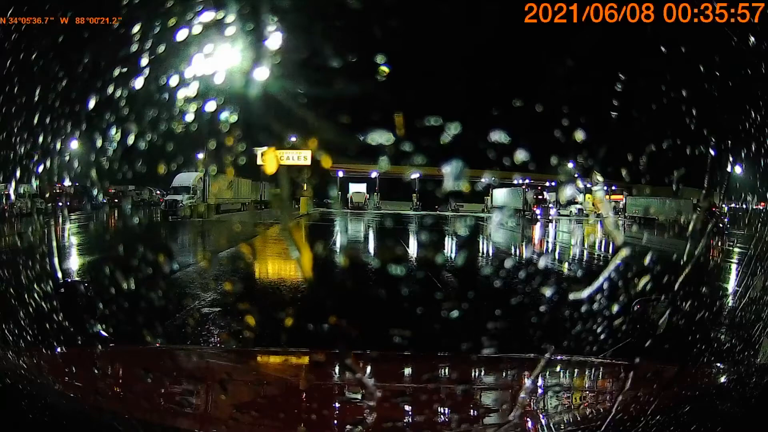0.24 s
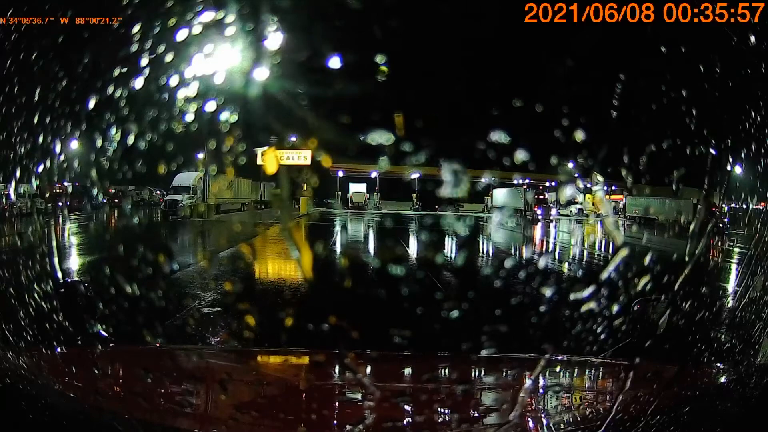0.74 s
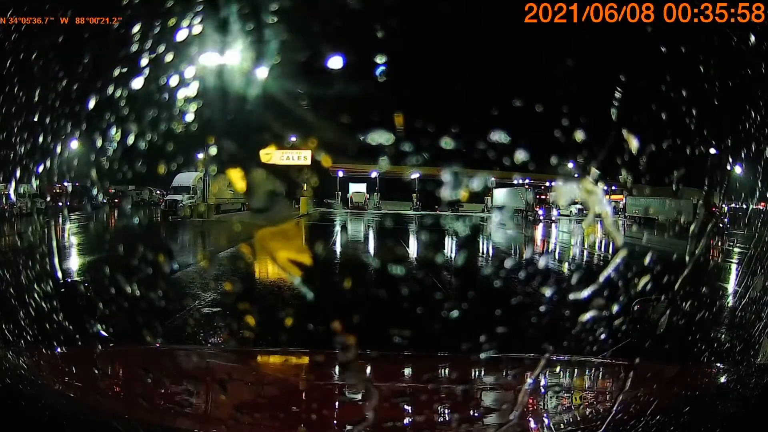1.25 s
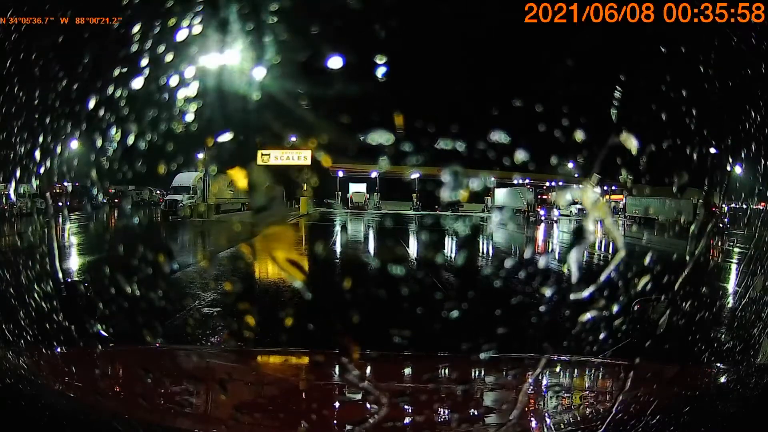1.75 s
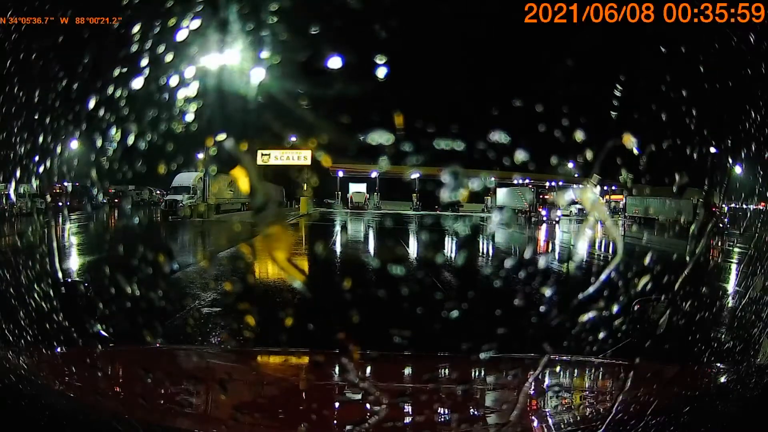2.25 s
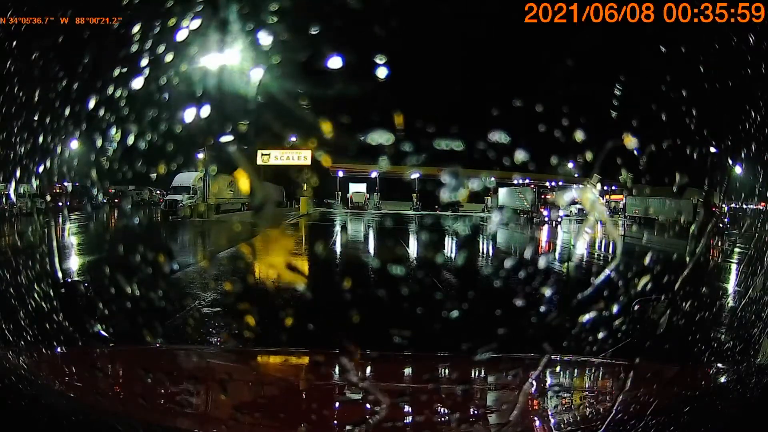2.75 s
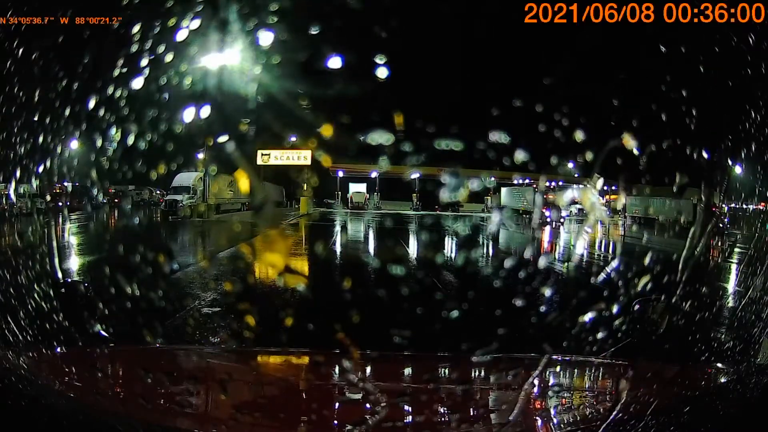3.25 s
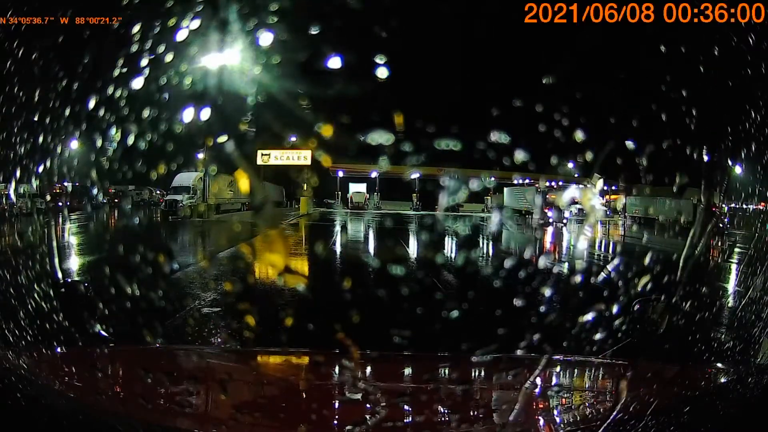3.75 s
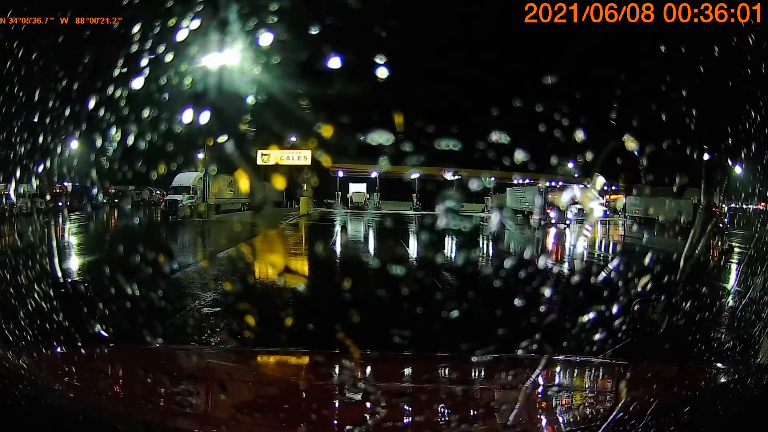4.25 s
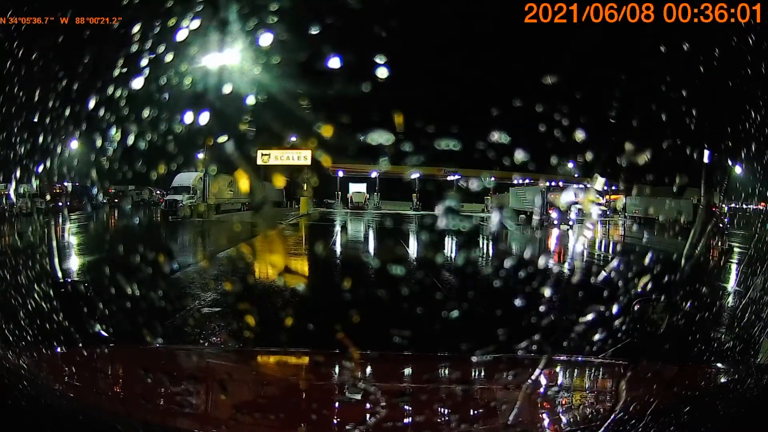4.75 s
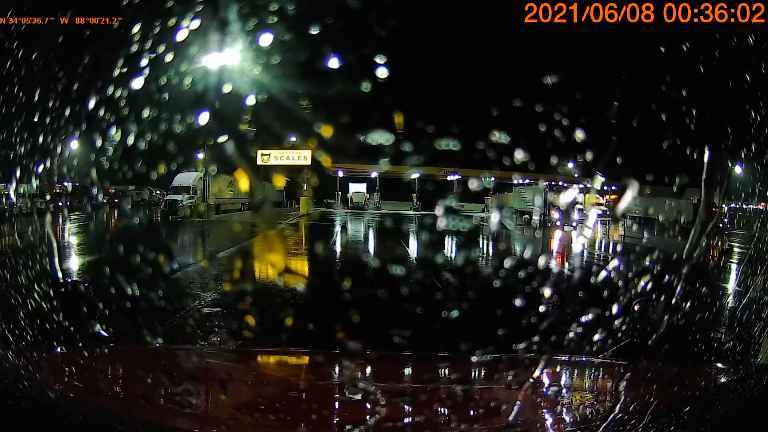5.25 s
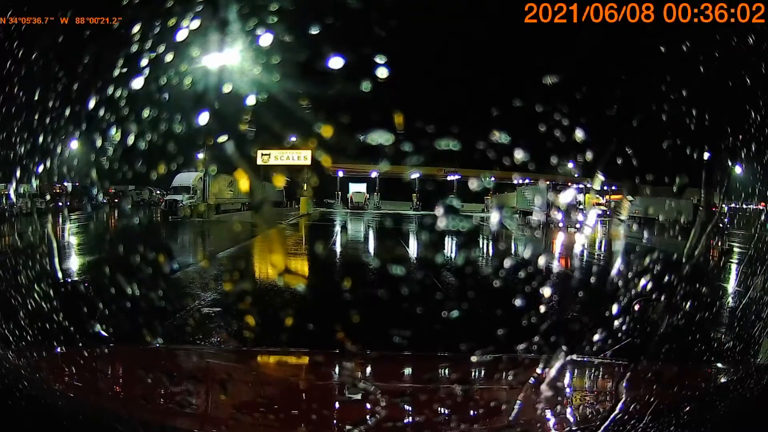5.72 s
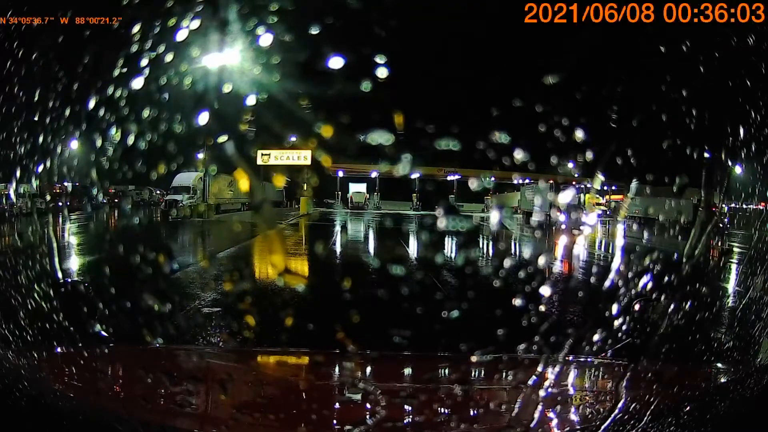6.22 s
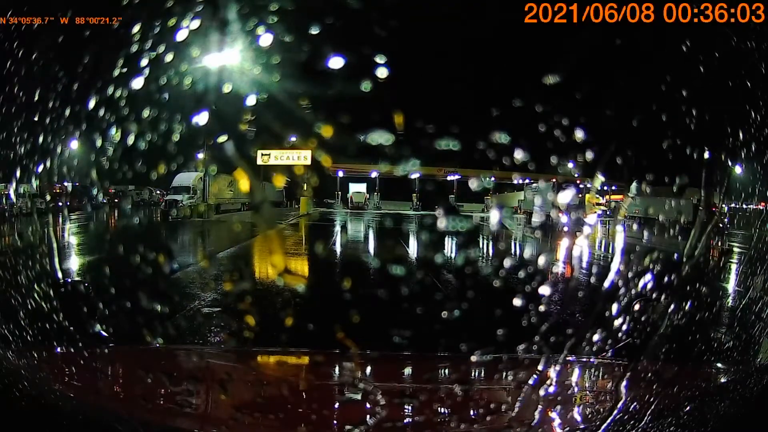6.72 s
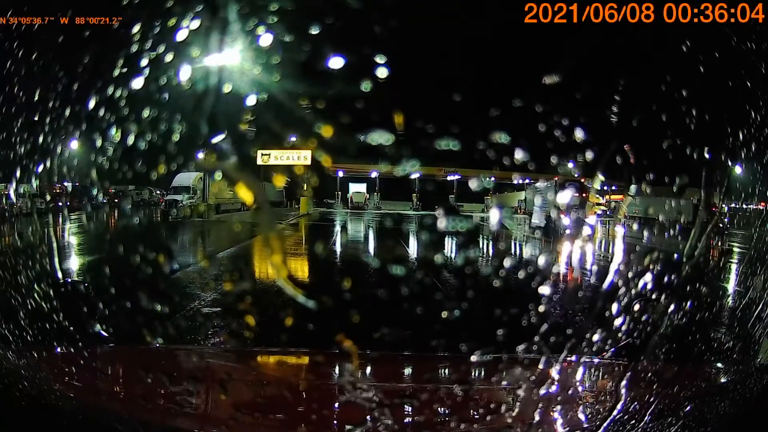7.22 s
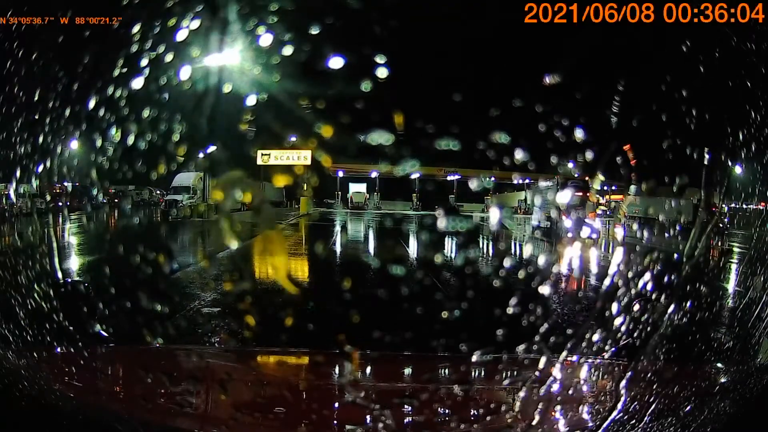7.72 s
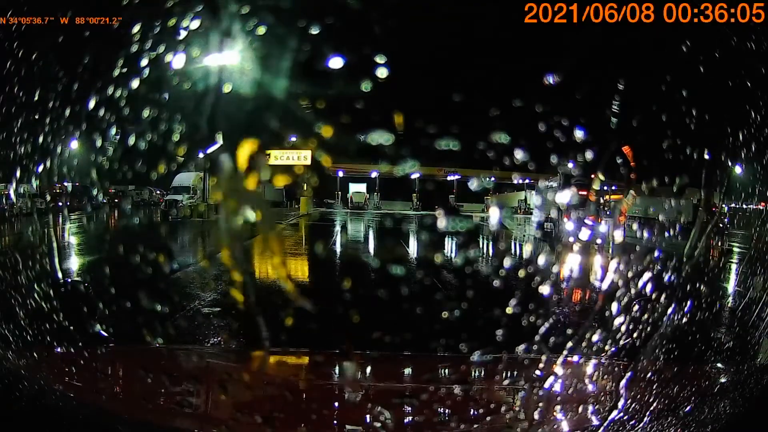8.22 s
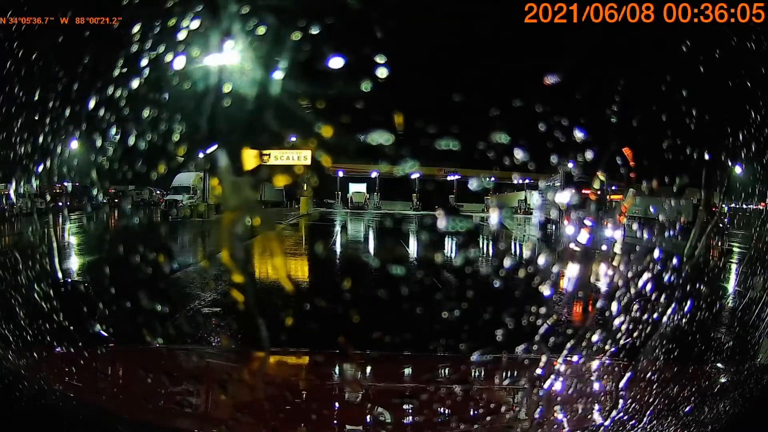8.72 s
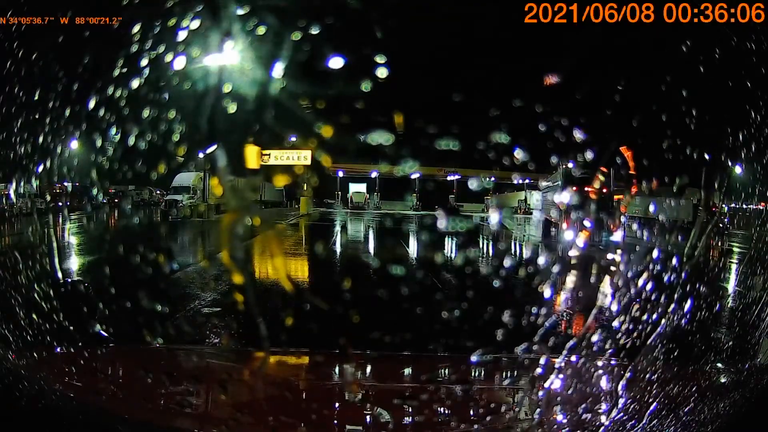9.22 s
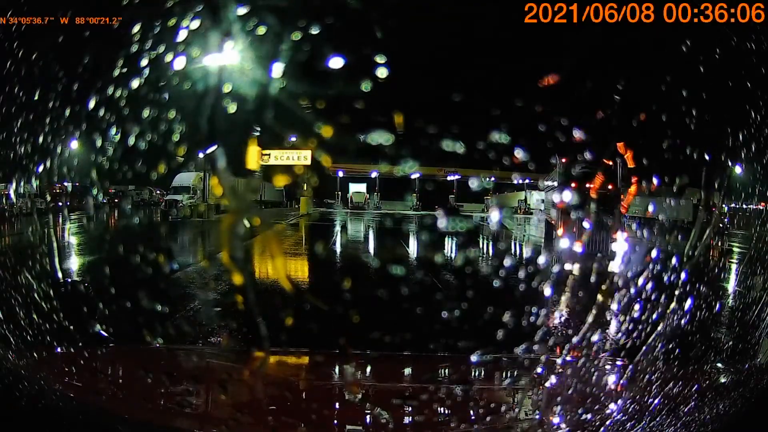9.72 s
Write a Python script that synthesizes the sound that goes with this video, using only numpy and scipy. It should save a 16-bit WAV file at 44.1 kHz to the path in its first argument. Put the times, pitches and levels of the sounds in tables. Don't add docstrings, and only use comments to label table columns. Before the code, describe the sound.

Inside a parked truck cab, a six-cylinder diesel idles with a low throbbing roar, steady clatter and knocks, over faint electrical buzz.

```python
import sys
import numpy as np
from scipy import signal
from scipy.fft import rfft, irfft, next_fast_len
from scipy.io import wavfile
from scipy.ndimage import uniform_filter1d, map_coordinates

SR = 44100
rng = np.random.default_rng(int(sys.argv[2]) if len(sys.argv) > 2 else 0)


def volts_from_decibels(level):
    exponent = np.asarray(level, float) / 20
    return 10 ** exponent


def store_pcm(level_fs):
    pcm = np.round(np.clip(level_fs, -1, 1) * 32767).astype(np.int16)
    wavfile.write(sys.argv[1], SR, np.atleast_2d(pcm).T)


N = 439677

CYCLE_HZ, FIRINGS_A_CYCLE = 4.99677, 6
FRAME_HZ = 29.9806
FIRST_FIRING_S = .031
# start_s, length_s
DROPOUT = (5.2673, .021333)
# time_s, crank_late_ms
IDLE_HUNTING = [
    (0, -1.5),
    (2, -.5),
    (4.5, 1.5),
    (6, -.5),
    (8, 1),
    (10, -1),
]
# pitch_hz, level_db (per Hz)
ROAR_SPECTRUM = [(12, -55.5), (26, -36.5), (38, -25), (55, -5.5), (100, -3.5), (151, -6.5), (318, -14),
                 (832, -19), (1170, -22), (1580, -32.5), (2120, -32.5), (3940, -43.5), (6140, -48.5),
                 (7300, -46.5)]
# pitch_hz, width_hz, gain_db
CAB_RESONANCES = [(212, 15, 5), (270, 20, 4), (355, 30, 3), (425, 22, 6), (460, 30, -4), (500, 30, 6),
                  (535, 20, 4), (568, 15, 3), (592, 20, -5), (628, 25, 6), (705, 30, 5), (860, 90, 1),
                  (1020, 60, -6), (1160, 140, -5), (1290, 40, -4), (1520, 100, -2), (1870, 50, -4),
                  (2470, 80, -3), (6500, 400, 2), (1797, 36, 4), (2090, 90, 3), (2930, 120, 3),
                  (3290, 44, 4), (3600, 300, 2), (4395, 44, 4), (5120, 76, 3), (5725, 40, 3),
                  (6090, 100, 3), (6270, 40, 5)]
# multiple_of_cycle, level_db
CRANK_ORDERS = [(17, -62), (22, -62.5), (27, -49), (33, -52), (39, -63), (43, -64.5), (49, -59), (54, -67)]
# pitch_hz, level_db
NEIGHBOUR_TONES = [(42.3, -58.5), (54.1, -63), (58.2, -59), (68.3, -62.5), (74.06, -51), (81.6, -64.5),
                   (89.4, -61), (96.9, -52.5), (104.1, -62), (105.8, -56), (111.7, -57), (134, -54.5),
                   (138.1, -54), (152.4, -63.5), (155.06, -45.5), (159, -66.5), (428.8, -65)]
# pitch_hz, level_db, in_step_s (with the first)
BEATING_TONES = [(46.923, -45.8, 2), (45.934, -49.7, 1.88), (45.021, -52.3, 2.05), (44.161, -55.7, 2.05),
                 (44.582, -62, 1.99)]
# multiple_of_frame_rate, level_db
FRAME_HUM = [(1, -47), (2, -46), (3, -52), (4, -50), (5, -54), (6, -60.5), (7, -65.5)]
PART_MODES = { "block": [(427, 0, .07), (500, 0, .06), (535, -3, .08), (630, 0, .07), (705, -1, .07),
              (760, -5, .07)], "cover": [(905, -6, .09), (942, -2.5, .1), (987, 0, .105)],
              "shield": [(1062, 0, .12), (1103, -1, .12)], "bracket": [(1350, 0, .1), (1420, -5, .07)],
              "pump": [(1797, -2, .08), (1940, -3, .03), (2090, 0, .04), (2190, -3, .03)]}
COMBUSTION_KNOCKS = { "block": (0, [-50, -50, -43, -43, -42.5, -51.5]),
                     "cover": (-.0005, [-53, -40, -51, -47.5, -55, -46.5]),
                     "pump": (-.005, [-61, -54.5, -57.5, -60, -60, -58])}
FURTHER_KNOCKS = { "block": [(.016, -50.5), (.083, -48.5), (.114, -38.5), (.149, -45), (.178, -41)],
                  "cover": [(.079, -51), (.090, -48)], "shield": [(.003, -53), (.031, -56.5), (.072, -49),
                  (.096, -60.5), (.132, -54), (.157, -59), (.188, -58.5)], "pump": [(.036, -59.5),
                  (.100, -62), (.138, -59.5), (.188, -62.5)]}
# start_s, peak_db
HARD_KNOCKS = [
    (2.6994, -47),
    (3.0694, -45),
    (5.4994, -49),
    (6.4792, -46),
    (7.4425, -49),
    (8.2741, -45),
]


def unit(x):
    return x / np.sqrt(np.mean(x ** 2) + 1e-20)


def wobble(rate):
    knots = rng.standard_normal(int(N * rate / SR) + 4)
    return map_coordinates(knots, [np.arange(N) * rate / SR])


def filtered(x, response):
    m = next_fast_len(N + SR // 2)
    return irfft(rfft(x, m) * response(np.fft.rfftfreq(m, 1 / SR)), m)[..., :N]


def cab(f):
    hz, db = np.transpose(ROAR_SPECTRUM)
    bumps = sum(gain / (1 + (2 * (f - centre) / width) ** 2) for centre, width, gain in CAB_RESONANCES)
    return volts_from_decibels(np.interp(np.log(f + 1), np.log(hz + 1), db) + bumps)


def true_time():
    t = np.arange(N) / SR
    start_s, length_s = DROPOUT
    return t + length_s * np.clip((t - start_s) / .008, 0, 1)


def roar():
    spectrogram = signal.stft(rng.standard_normal(N), nperseg=512)[2]
    patches = uniform_filter1d(rng.standard_normal(spectrogram.shape), 8, 0)
    patches = unit(uniform_filter1d(patches, 5, 1))
    noise = signal.istft(spectrogram * volts_from_decibels(.6 * patches), nperseg=512)[1][:N]

    t = true_time()
    firing = np.cos(2 * np.pi * FIRINGS_A_CYCLE * CYCLE_HZ * (t - .027))
    once_a_cycle = np.cos(2 * np.pi * CYCLE_HZ * (t - .07))
    flutter = wobble(22)
    flutter = flutter - uniform_filter1d(flutter, size=SR // 6)
    swell = volts_from_decibels(1.0 * firing + 0.47 * once_a_cycle + 0.84 * flutter)

    def engine_share(f):
        return 1 / (1 + (800 / (f + 1)) ** 4) / (1 + (f / 6500) ** 4)

    steady = filtered(noise, cab)
    pulsing = filtered(noise * (swell - 1), lambda f: cab(f) * engine_share(f))
    return volts_from_decibels(-40) * (steady + pulsing) / np.std(steady)


def tone(hz, t, drift):
    return np.sqrt(2) * np.sin(2 * np.pi * (hz * t + rng.random() + drift * wobble(1.5)))


def drones():
    t = true_time()
    total = np.zeros(N)
    for order, db in CRANK_ORDERS:
        total += volts_from_decibels(db + 1.8 * wobble(1.5)) * tone(order * CYCLE_HZ, t, drift=.067)
    for hz, db in NEIGHBOUR_TONES:
        total += volts_from_decibels(db + 1.8 * wobble(4)) * tone(hz, t, drift=.08)
    return total


def throb():
    t = true_time()
    lead_hz = BEATING_TONES[0][0]
    total = np.zeros(N)
    for hz, db, in_step_s in BEATING_TONES:
        turns = hz * t + (lead_hz - hz) * in_step_s
        total += volts_from_decibels(db + .5 * wobble(2.5)) * np.sqrt(2) * np.sin(2 * np.pi * turns)
    return total


def frame_buzz():
    t = true_time()
    hum = np.zeros(N)
    for k, db in FRAME_HUM:
        level = volts_from_decibels(db + 1.6 * wobble(3.5) * (k > 1))
        hum += level * np.sqrt(2) * np.cos(2 * np.pi * k * FRAME_HZ * (t - .0012))

    frames = (t - .0285) * FRAME_HZ
    since = frames % 1 / FRAME_HZ
    late = .00003 * (np.floor(frames) % 3 == 1)
    gate = np.clip(since / .0015, 0, 1) * np.clip((.012 - since) / .002, 0, 1) * volts_from_decibels(-300 * since)
    whine = np.sin(2 * np.pi * 6085 * (since - late))
    whine += 0.2 * np.sin(2 * np.pi * 6040 * (since - late))
    return hum + volts_from_decibels(-68 + 1.5 * wobble(14)) * gate * whine


def every_cycle(offsets, db, scatter_db, jitter_s):
    t = true_time()
    crank = t - np.interp(t, *np.transpose(IDLE_HUNTING)) / 1000
    when = np.arange(-1, 51)[:, None] / CYCLE_HZ + offsets
    early_late, soft_hard = rng.standard_normal((2,) + when.shape)
    at = np.interp(when + jitter_s * early_late, crank, np.arange(N)).astype(int)
    start_s, length_s = DROPOUT
    heard = (at > 0) & (at < N - 1) & (np.abs(when - start_s - length_s / 2) > length_s / 2)
    strength = volts_from_decibels(db + scatter_db * soft_hard) * heard
    return np.bincount(at.ravel(), strength.ravel(), N)


def clatter():
    place, chance = rng.random((500, 2)).T
    hits = every_cycle(place / CYCLE_HZ, 3 * np.log(chance + .05), scatter_db=2, jitter_s=.00012)
    return volts_from_decibels(-48) * unit(filtered(hits, lambda f: cab(f) * (f > 180) / (1 + (f / 2500) ** 4)))


def bracket_rattle():
    rattles = 16
    turn = np.arange(rattles) / rattles
    slap_s, slap_extra_db = .0875, 8.5
    return slap_s + turn / CYCLE_HZ, -63.5 + 3 * np.cos(2 * np.pi * turn) + slap_extra_db * (turn == 0)


def contacts(part):
    if part == "bracket":
        return bracket_rattle()
    lag_s, cylinders_db = COMBUSTION_KNOCKS.get(part, (0, []))
    fired = []
    for k, db in enumerate(cylinders_db):
        fired.append((FIRST_FIRING_S + lag_s + k / FIRINGS_A_CYCLE / CYCLE_HZ, db))
    return np.transpose(fired + FURTHER_KNOCKS[part])


def knocks():
    t = np.arange(SR // 8) / SR
    total = np.zeros(N)
    for part, modes in PART_MODES.items():
        ring = np.zeros(len(t))
        for k, (hz, db, t60) in enumerate(modes):
            ring += (-1) ** k * volts_from_decibels(db - 60 * t / t60) * np.sin(2 * np.pi * hz * t)
        ring *= 1 - np.exp(-(t / .004) ** 2)
        moments, db = contacts(part)
        peak_s = np.argmax(ring) / SR
        blows = every_cycle(moments - peak_s, db, scatter_db=1.7, jitter_s=.0004)
        total += signal.fftconvolve(blows, ring / ring.max())[:N]
    return total


def snaps():
    rise_s, t60_s, spray_db = .004, .16, -6.5
    spray = unit(filtered(rng.standard_normal(N),
                          lambda f: cab(f) * f * (f > 1200) / (1 + (f / 3800) ** 4)))
    t = np.arange(N) / SR
    envelope = np.zeros(N)
    for start_s, peak_db in HARD_KNOCKS:
        since = np.clip(t - start_s, 0, 1)
        envelope += volts_from_decibels(peak_db + spray_db - 60 * since / t60_s) * (1 - np.exp(-since / rise_s))
    return spray * envelope


def dropout_tick():
    click = volts_from_decibels(-55) * (np.arange(N) == round(DROPOUT[0] * SR))
    return filtered(click, lambda f: (f > 6000) * (f < 15800))


def scene():
    return (roar() + drones() + throb() + frame_buzz() + clatter() + knocks() + snaps())[None]


def roll_off(x):
    return signal.sosfilt(signal.butter(12, 7540, fs=SR, output="sos"), x)


def record(dry):
    narrow = filtered(dry, lambda f: np.clip((7800 - f) / 850, 0, 1) ** 3)
    hiss = volts_from_decibels(-100) * rng.standard_normal(N)
    return roll_off(narrow + dropout_tick() + hiss)


dry = scene()
out = record(dry)
store_pcm(out)
```